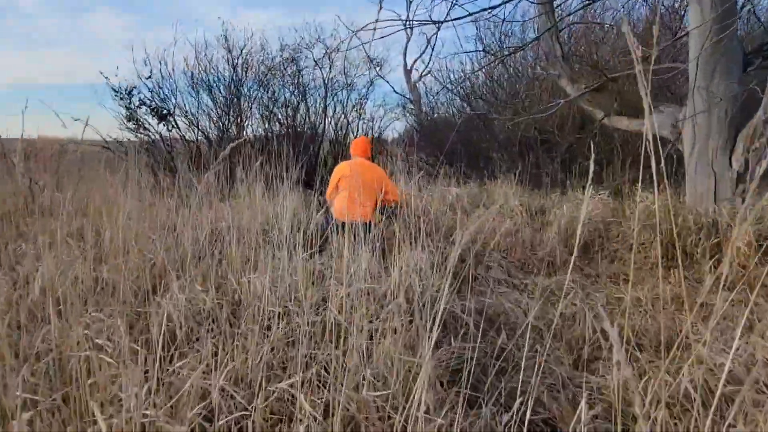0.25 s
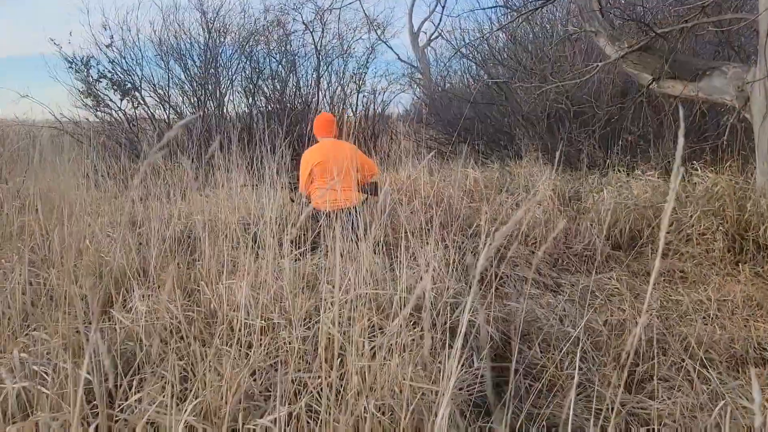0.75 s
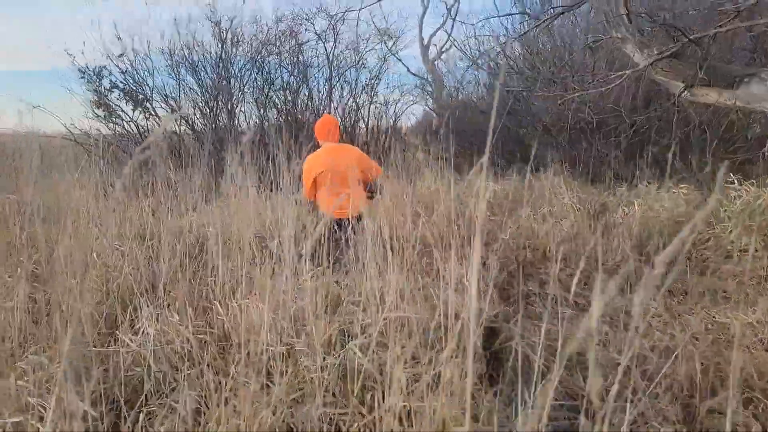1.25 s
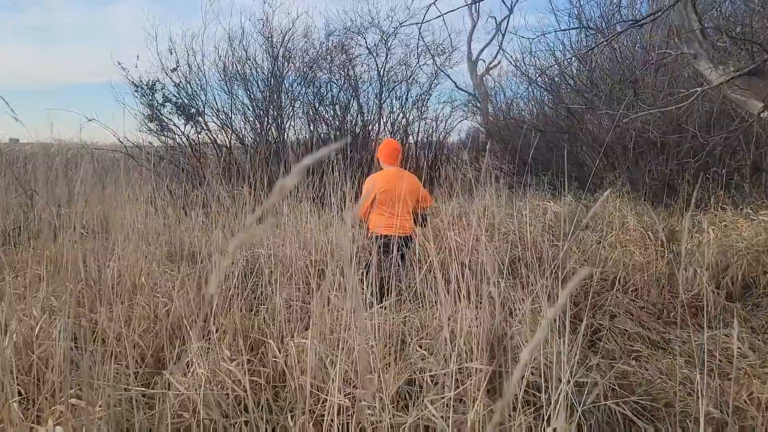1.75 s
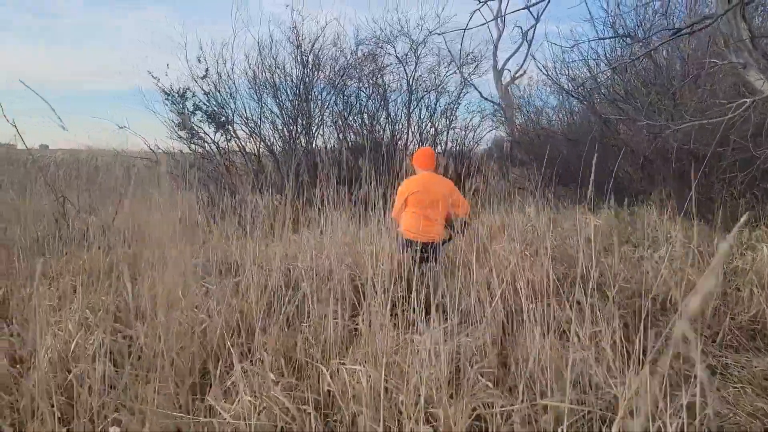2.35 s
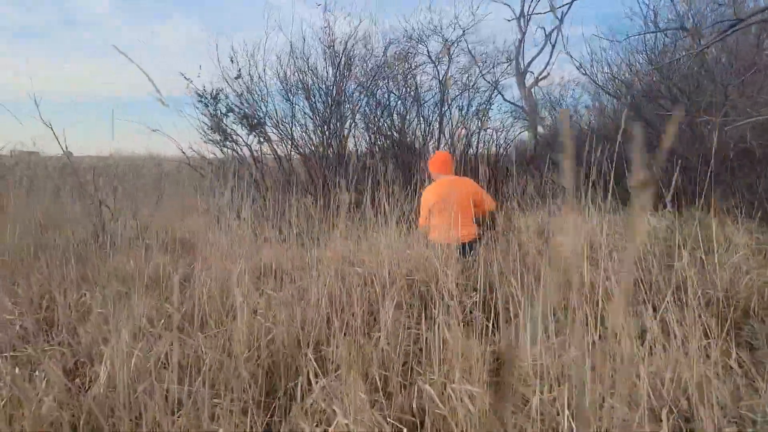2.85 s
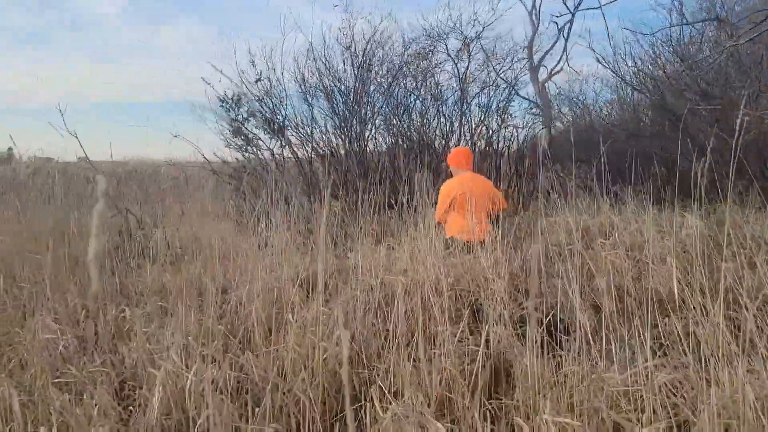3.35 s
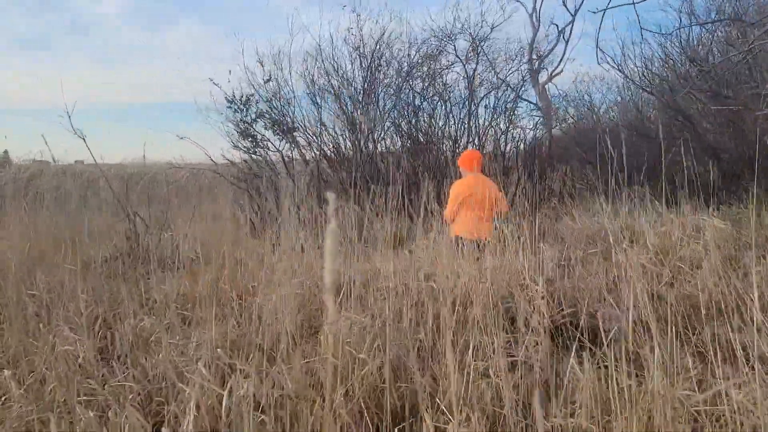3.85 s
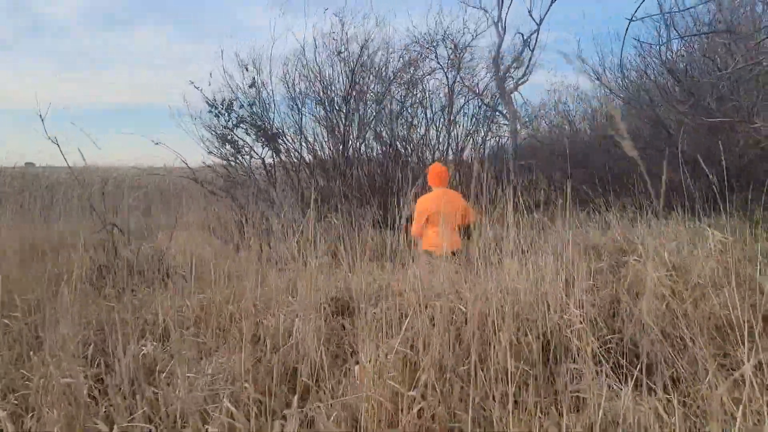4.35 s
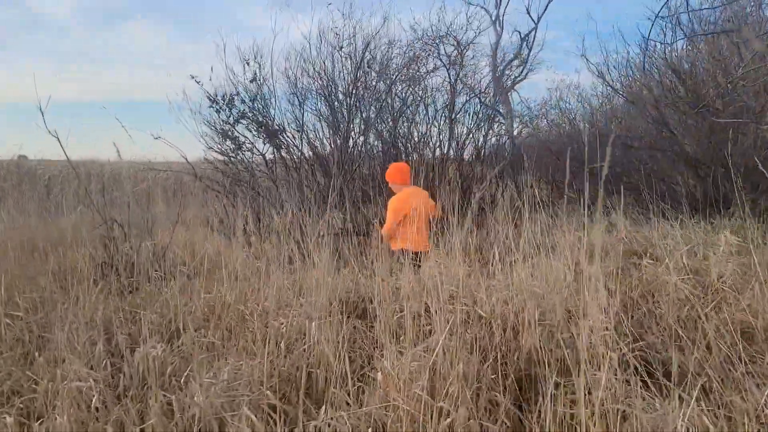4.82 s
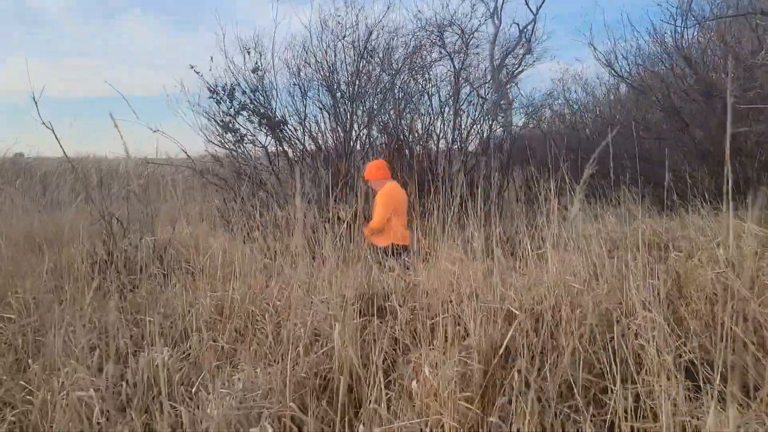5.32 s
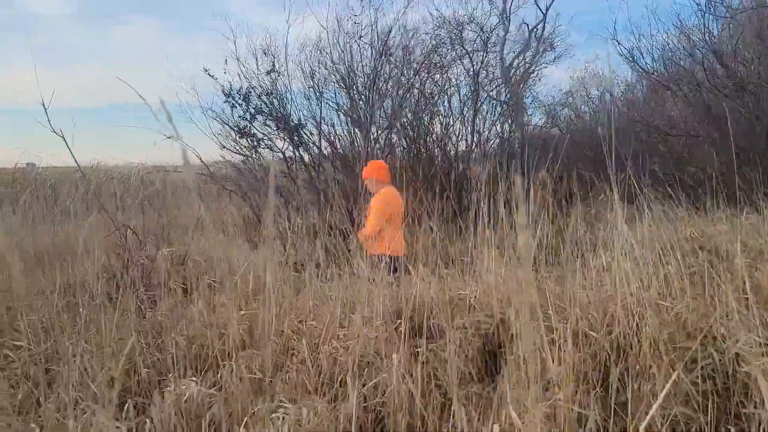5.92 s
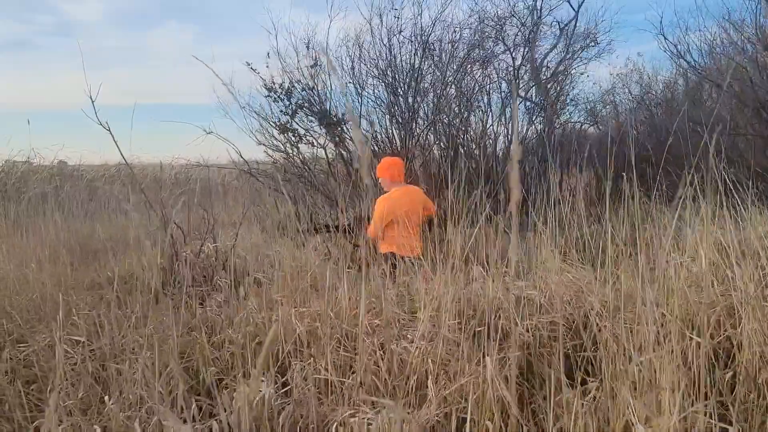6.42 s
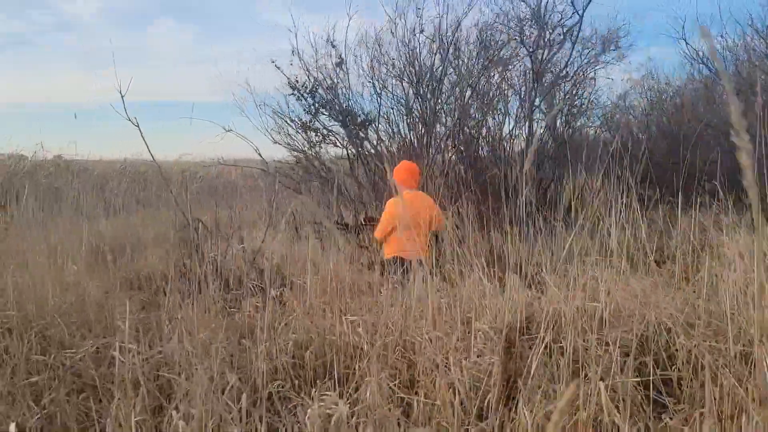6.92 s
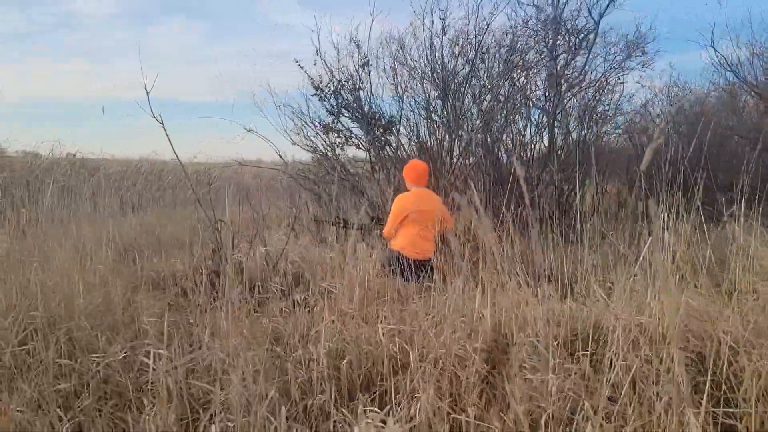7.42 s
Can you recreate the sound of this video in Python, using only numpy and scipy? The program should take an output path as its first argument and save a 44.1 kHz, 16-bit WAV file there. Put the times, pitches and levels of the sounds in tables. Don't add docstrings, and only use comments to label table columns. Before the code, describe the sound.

Close, bright swishes of dry grass against walking legs, crackling with snapped stems and flicking blades, over dull steps and brief low wind buffets.

```python
import sys
import numpy as np
from scipy import signal
from scipy.fft import rfft, irfft, next_fast_len
from scipy.io import wavfile
from scipy.ndimage import uniform_filter1d, map_coordinates

SR = 44100
rng = np.random.default_rng(int(sys.argv[2]) if len(sys.argv) > 2 else 0)


def unload_audio(sound):
    columns = np.transpose(np.atleast_2d(sound))
    steps = np.round(np.clip(columns, -1, 1) * 32767)
    wavfile.write(sys.argv[1], SR, steps.astype(np.int16))


def undo_db(level):
    steps = np.asarray(level, float) / 20
    return 10 ** steps


N = 338247
MS = np.arange(0, N / SR + .001, .001)
USUAL_DB = -28


def unit(x):
    return x / np.sqrt(np.mean(x ** 2) + 1e-20)


def peaked(x):
    return x / np.abs(x).max()


def along(points, hz):
    f, v = np.transpose(points)
    return np.interp(np.log(hz + 1), np.log(f + 1), v)


def curves(rows):
    s, *cols = np.transpose(rows)
    return [np.interp(np.arange(N) / SR, s, c) for c in cols]


def per_sample(rows):
    return np.array(curves(np.vstack([MS, rows]).T))


def wobble(rate):
    knots = rng.standard_normal(int(N * rate / SR) + 4)
    return map_coordinates(knots, [np.arange(N) * rate / SR])


def sides(pan_db):
    return undo_db(np.array([pan_db / 2, -pan_db / 2]))


def filtered(x, response):
    m = next_fast_len(N + 8192)
    return irfft(rfft(x, m) * response(np.fft.rfftfreq(m, 1 / SR)), m)[..., :N]


def humps(s, db, rise, fall, hold=0):
    t = MS - s[:, None]
    before = np.maximum(-t * rise[:, None], 0)
    after = np.maximum((t - np.reshape(hold, (-1, 1))) * fall[:, None], 0)
    return undo_db(2 * (db[:, None] - before - after))


# (frequency [Hz], level [dB per Hz])
RUMBLE_COLOUR = [(12, -37), (20, 9.5), (38, -0.5), (60, 11), (83, 3), (140, -11), (180, -52), (310, -120)]
# (time [s], peak level [dB], fade on both sides [dB/s], left-right [dB])
WIND_GUSTS = [(.42, -63, 80, -4), (1.09, -56, 100, 0), (1.22, -47, 110, 18), (1.36, -39, 160, 6),
              (1.45, -35, 200, 1), (1.57, -42, 120, -6), (1.83, -44, 300, -4), (2.07, -48, 240, 14),
              (2.19, -48, 110, 5), (2.3, -46.5, 140, 13), (2.53, -50, 130, -2), (2.65, -43, 70, 3),
              (2.95, -56, 65, -12), (3.46, -56, 100, 12), (4.02, -63, 60, -11), (4.12, -54, 130, 9),
              (4.34, -56, 163, 2), (4.57, -54.5, 64, 15), (4.78, -60, 50, -4), (5.02, -52, 70, 18),
              (5.12, -45, 300, -8), (5.21, -41, 160, 9), (5.48, -56, 52, -4), (5.8, -60, 40, 1),
              (6.42, -64, 30, 9), (6.79, -56.5, 90, -13), (6.9, -51, 152, 8), (7.67, -58, 90, 1)]


def wind():
    calm_db = -70
    s, db, fade, pan_db = np.transpose(WIND_GUSTS)
    power = sides(pan_db) ** 2 @ humps(s, db, fade, fade)
    force = per_sample(np.sqrt(power + undo_db(2 * calm_db)))
    eddies = filtered(rng.standard_normal((2, N)), lambda hz: undo_db(along(RUMBLE_COLOUR, hz)))
    lumps = undo_db(1.9 * np.array([wobble(8.5), wobble(4.8)]))
    return force * unit(lumps * eddies)


def silence():
    return np.zeros((2, N + SR))


def burst_time():
    return np.arange(SR // 20) / SR


def add(track, s, burst, pan_db):
    for port, gain, late in zip(track, sides(pan_db), (0, 5)):
        port[round(s * SR) + late:][:len(burst)] += gain * burst


def pop(hz, cycles):
    t = burst_time()
    return peaked(undo_db(-60 * t * hz / cycles) * np.sin(2 * np.pi * hz * t))


def crack(t60):
    t = burst_time()
    bright = signal.butter(2, 7500, "high", fs=SR, output="sos")
    return peaked(signal.sosfilt(bright, rng.standard_normal(len(t)) * undo_db(-60 * t / t60)))


# (time [s], peak level [dB], pitch [Hz])
BOOT_THUDS = [(0.222, -37, 415), (2.062, -37, 353), (2.492, -38, 256), (2.706, -52, 330), (2.836, -44, 452),
              (3.566, -35, 385), (4.101, -41.5, 320), (4.253, -41, 262), (4.94, -39, 261),
              (5.224, -37, 495), (6.087, -33, 498), (6.516, -38, 415), (7.476, -46, 487)]


def boots():
    track = silence()
    for s, db, hz in BOOT_THUDS:
        add(track, s, undo_db(db + 4.5) * pop(1.52 * hz, cycles=5.7), -1.5)
    return track[:, :N]


# (time [s], peak level [dB], left-right [dB])
BLADE_FLICKS = [
    (2.8335, -13, -1.5),
    (2.852, -14, -4),
    (2.9412, -6.5, -5),
    (2.9515, -12, -4),
    (3.5176, -7, -4),
    (3.5614, -6, -2),
    (4.185, -17, -3),
    (5.1556, -13, -2.5),
    (6.8954, -18, -3.5),
    (7.1524, -13, -1),
]


def flicks():
    track = silence()
    for s, db, pan_db in BLADE_FLICKS:
        add(track, s, undo_db(db) * crack(.009), pan_db)
    return track[:, :N]


# (time [s], peak level [dB], bright crack against peak [dB], left-right [dB], pitch [Hz])
STEM_SNAPS = [(0.219, -14, -1, 2, 2150), (0.668, -29, 6, -5, 1200), (2.825, -10.5, 3, 3, 2760),
              (2.851, -27, 4, -1, 840), (2.871, -21, 1, -0.5, 1790), (3.812, -20, -5, -3, 1390),
              (4.357, -16, 0, -5, 2750), (5.043, -14.5, 6, 6, 2120), (5.649, -27.5, -5, -3.0, 1420),
              (6.13, -12.5, 4, 1, 2300), (6.258, -10, 18, 0, 2230), (6.344, -19, 9, -1, 3050),
              (6.716, -8.5, -6, -6, 3300)]


def snaps():
    track = silence()
    for s, db, crack_db, pan_db, hz in STEM_SNAPS:
        wood = undo_db(db - 5.0) * pop(hz, cycles=16.0)
        fibres = undo_db(db + crack_db - 15) * crack(0.0059)
        add(track, s + 0.0009, wood + fibres, pan_db)
    return track[:, :N]


# (full contact time [s], hold [s], peak level [dB], rise [dB/s], release [dB/s])
LEG_SWEEPS = [(0.12, 0.012, -25, 36, 113), (0.785, 0.12, -20, 224, 36.5), (1.04, 0.045, -24.5, 55, 74),
              (1.84, 0.16, -25, 40, 82), (2.199, 0.24, -20.3, 75, 32.5), (3.549, 0.059, -21.5, 61, 50.5),
              (3.71, 0.12, -24.5, 40, 99), (4.9, 0.12, -22.5, 57.5, 74), (5.121, .15, -29, 46, 81),
              (6.031, 0.036, -26.5, 83, 40), (6.14, 0.23, -22, 52.5, 63), (7.27, 0.097, -24.5, 51, 28)]
# (time [s], peak level [dB], fade on both sides [dB/s])
PASSING_TUFTS = [(0.635, -32.5, 120), (0.56, -42, 150), (0.7, -33, 200), (1.98, -35, 200),
                 (2.84, -25.5, 134), (2.96, -30.5, 300), (4.09, -28, 300), (3.57, -24, 150),
                 (3.44, -33, 150), (2.29, -24, 100), (4.96, -26, 150), (6.35, -26, 150), (4.18, -30.5, 197),
                 (4.46, -39, 155), (4.74, -43, 93), (5.79, -28.5, 120), (6.56, -45, 154), (0.24, -46, 103),
                 (1.37, -29, 100), (1.47, -28.5, 100), (2.6, -40, 150), (2.6, -33, 100), (4.28, -48, 100),
                 (6.49, -50, 200), (6.81, -27.5, 114), (6.9, -29, 250), (7.155, -40, 120), (7.67, -30, 250)]
# (time [s], level [dB])
SETTLING = [(0, -34), (.45, -26.5), (.7, -36.5), (1.25, -30.5), (1.7, -34), (2.75, -31.5), (2.95, -34),
            (3.17, -31), (3.37, -36.5), (3.99, -37), (4.13, -33), (4.45, -29.5), (4.66, -32), (5.55, -40),
            (5.88, -35.5), (6.62, -33), (6.85, -30.5), (7.67, -30)]


def effort():
    tuft_dull_db = -1.5
    swing_ms_per_s = -.18
    start, hold, db, rise, fall = np.transpose(LEG_SWEEPS)
    sweeps = humps(start, db, rise, fall, hold)
    body = sweeps.sum(0) + undo_db(2 * np.interp(MS, *np.transpose(SETTLING)))
    s, db, fade = np.transpose(PASSING_TUFTS)
    tufts = humps(s, db, fade, fade).sum(0)
    swing_ms = swing_ms_per_s * (sweeps * (MS - start[:, None])).sum(0) / body
    levels = 10 * np.log10([body + tufts, body + undo_db(2 * tuft_dull_db) * tufts]) - USUAL_DB
    return per_sample([*levels, sweeps.sum(0) / body, swing_ms])


def patchy(x, depth_db):
    z = signal.stft(x, nperseg=512)[2]
    field = rng.standard_normal(z.shape[1:])
    field = uniform_filter1d(field, size=7, axis=0)
    field = uniform_filter1d(field, size=12, axis=1)
    return signal.istft(z * undo_db(depth_db * unit(field)), nperseg=512)[1][:, :N]


def scrapes(count, spectrum, runs, spread_db, near_ms, wide_ms, patch_db, legs):
    at = rng.integers(0, N, count)
    lag_ms, share = legs
    force = np.minimum(rng.exponential(size=count), 4.5)
    size = rng.standard_normal(count) * undo_db(spread_db * force + runs[at])
    spot, scatter = rng.random(count), rng.standard_normal(count)
    lag = np.where(spot > .8, 0.31 + 1.3 * near_ms * scatter, wide_ms * scatter)
    lag = np.where(spot < 2.25 * share[at], lag_ms[at] + near_ms * scatter, lag)
    half = lag * SR / 2000 * np.array([[1], [-1]]) + rng.random(count)
    pair = [np.bincount(np.clip(at + h, 0, N - 1).astype(int), size, N) for h in half]
    return unit(filtered(patchy(np.array(pair), patch_db), lambda hz: undo_db(along(spectrum, hz))))


# (frequency [Hz], level [dB per Hz])
MAT_COLOUR = [(65, -26), (110, -11.5), (135, -11), (265, -7.5), (362, -3), (660, -3), (1000, -2.5),
              (1300, -11), (2200, -120)]


def tread(body_db, stems_db, legs):
    clicks = scrapes(count=30000, spectrum=MAT_COLOUR, runs=0.47 * wobble(80), spread_db=1.7,
                     near_ms=0.27, wide_ms=0.65, patch_db=2.0, legs=legs)
    return undo_db(-24 - 2.0 + 3.6 * stems_db + 0.39 * body_db) * clicks


# (frequency [Hz], level [dB per Hz])
STEM_COLOUR = [(410, -43.5), (700, -15.5), (997, -7), (1590, -3.5), (2140, -2), (3970, 0), (5000, -6),
               (6500, -6), (11000, -120)]


def swish(body_db, stems_db, runs, legs):
    clicks = scrapes(count=200000, spectrum=STEM_COLOUR, runs=0.13 * runs, spread_db=1.0,
                     near_ms=0.06, wide_ms=.5, patch_db=1.25, legs=legs)
    return undo_db(-9 + stems_db + 0.79 * body_db) * clicks


# (frequency [Hz], level [dB per Hz])
CLOTH_COLOUR = [(3500, -30.5), (4700, -6.5), (5600, -4.5), (6700, 0), (7300, -4), (7900, -9), (8600, -14),
                (10000, -60)]


def rasp(body_db, cloth_db, pan_db, runs, legs):
    clicks = scrapes(count=200000, spectrum=CLOTH_COLOUR, runs=0.47 * runs, spread_db=-0.5,
                     near_ms=0.041, wide_ms=.5, patch_db=0.9, legs=legs)
    return undo_db(-4 - 1.4 + cloth_db + body_db) * sides(0.76 * pan_db + 0.82) * clicks


# (frequency [Hz], level [dB per Hz])
BLADE_COLOUR = [(6500, -32), (7800, -19), (8300, -4), (9200, -1), (11300, 0), (12300, 4.5), (13200, 5.5),
                (14000, 3.5), (15600, -0.5)]


def fizz(blades_db, pan_db, runs, legs):
    clicks = scrapes(count=300000, spectrum=BLADE_COLOUR, runs=0.37 * runs, spread_db=-0.8,
                     near_ms=0.035, wide_ms=.5, patch_db=-0.5, legs=legs)
    return undo_db(blades_db + 0.67 * wobble(12)) * sides(pan_db + 3.6) * clicks


# (frequency [Hz], level [dB])
TILTED_COLOUR = [(500, -1), (1100, -2), (2400, -3.5), (4100, -5), (5500, -2.5), (7000, 0.5), (10000, -3.5),
                 (13500, 2.5)]


def tilted(near, tilt):
    tilt = np.clip(tilt, 0, 1)
    shaded = filtered(near, lambda hz: undo_db(along(TILTED_COLOUR, hz)))
    return (1 - tilt) * near + tilt * shaded


# (time [s], left port lag [ms], left-right [dB], cloth turned to the ports [dB],
# share of a sweep's scrapes from that spot [0-1])
LEG_BEARING = [(0, -0.52, 3.5, 3.5, 0.25), (.45, -.48, 0.5, 1.5, .45), (.6, -0.19, -6.5, -3, 0.25),
               (.9, -0.095, -2.5, 0.5, 0.19), (1.8, -0.083, -2.5, 0, 0.15), (2.2, -.13, -2.5, 0, 0.36),
               (3.5, -0.11, -3.5, 0, 0.31), (4.3, -0.14, -4, 0, 0.51), (5, -.11, -3, -1, .45),
               (5.5, -0.016, -2.5, 2.5, 0.29), (6.2, -.13, -4, -1.5, 0.34), (7.67, -0.08, -2, 0.5, 0.65)]
# (time [s], tilt [0-1], heavy stems [dB])
TILT_AND_GROWTH = [(0, 0, 1.5), (.6, 0, 0), (1, 0.2, 0.5), (1.7, 0.16, 1), (2.3, 0.1, -0.5), (3, 0.42, 0.5),
                   (3.4, 0.22, 0.5), (3.95, 0.09, -0.5), (4.5, 0.7, 1), (5, 0.44, -1), (5.5, 0.3, 1),
                   (5.8, 0.75, 0.5), (6.3, 0.62, 0.5), (6.6, 0.24, -.5), (7, 1, 0.5), (7.67, 0.6, 0)]


def grass():
    blades_db, body_db, sweeping, swing_ms = effort()
    lag_ms, pan_db, cloth_db, focus = curves(LEG_BEARING)
    tilt, stems_db = curves(TILT_AND_GROWTH)
    pan_db = pan_db + 0.12 * body_db
    scattered = .08
    legs = lag_ms + swing_ms, scattered + (focus - scattered) * sweeping
    catch_db = USUAL_DB + 3.0 + 0.067 * (wobble(7.6) + 0.22 * wobble(20))
    runs = wobble(350) + 0.17 * wobble(60)
    near = tread(body_db, stems_db, legs)
    near = near + swish(body_db, stems_db, runs, legs)
    near = near + rasp(body_db, cloth_db, pan_db, runs, legs)
    near = near + fizz(blades_db, pan_db, runs, legs)
    return tilted(undo_db(catch_db) * near, tilt)


def scene():
    return wind() + boots() + flicks() + snaps() + grass()


# (frequency [Hz], left-right [dB])
PORT_COLOUR = [(60, -3), (140, -.6), (330, -2.5), (770, -3), (1400, -5), (2700, -1.7), (4200, -0.9),
               (6500, -4.5), (7800, -2.5), (8600, -4), (10500, -2.5), (11400, -5), (12400, -2.5),
               (13800, -4), (15400, 12)]


def microphone_ports(dry):
    notch_hz, notch_wide_hz, notch_db = 8310, 250, -2.5
    notch = lambda hz: undo_db(notch_db * np.exp(-((hz - notch_hz) / notch_wide_hz) ** 2))
    return filtered(dry, lambda hz: sides(along(PORT_COLOUR, hz)) * notch(hz))


def top_cut(x):
    return signal.sosfilt(signal.butter(12, 15510, fs=SR, output="sos"), x)


def record(dry):
    mix = microphone_ports(dry)
    return top_cut(mix)


dry = scene()
out = record(dry)
unload_audio(out)
```